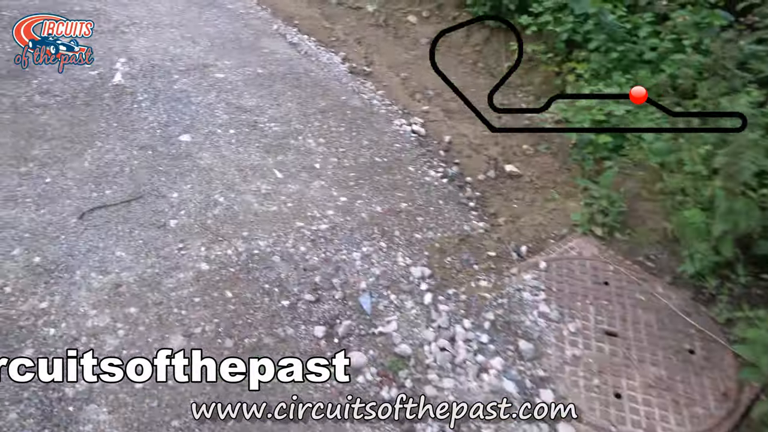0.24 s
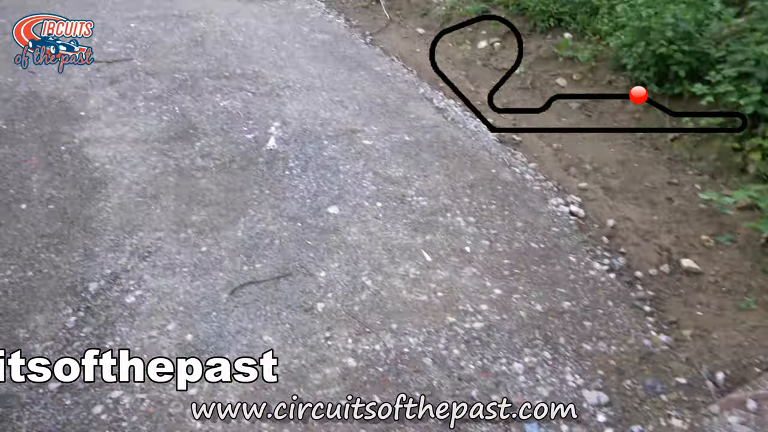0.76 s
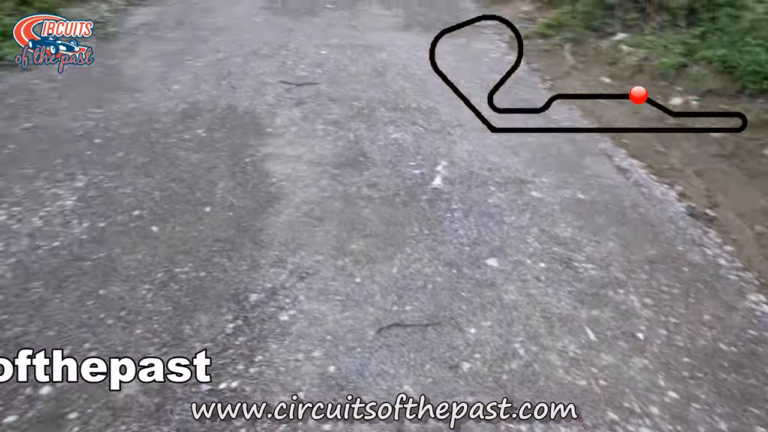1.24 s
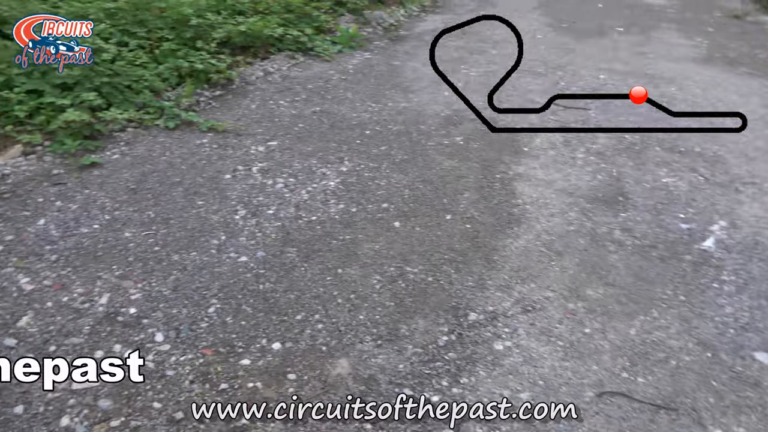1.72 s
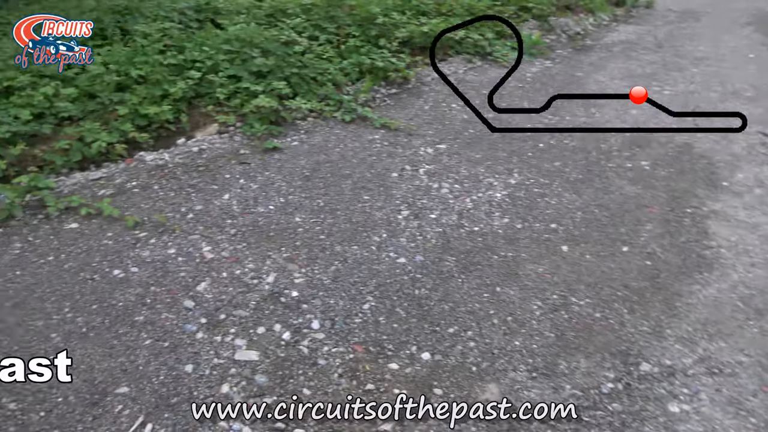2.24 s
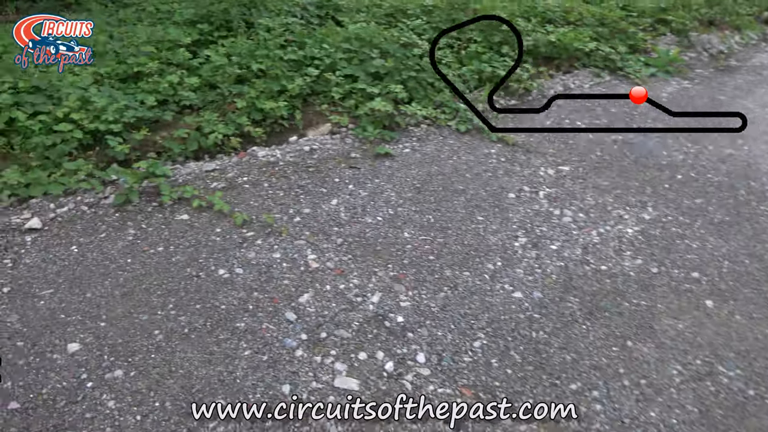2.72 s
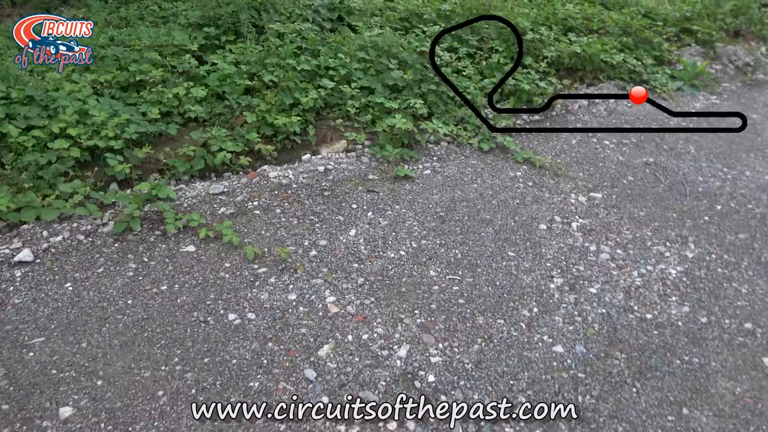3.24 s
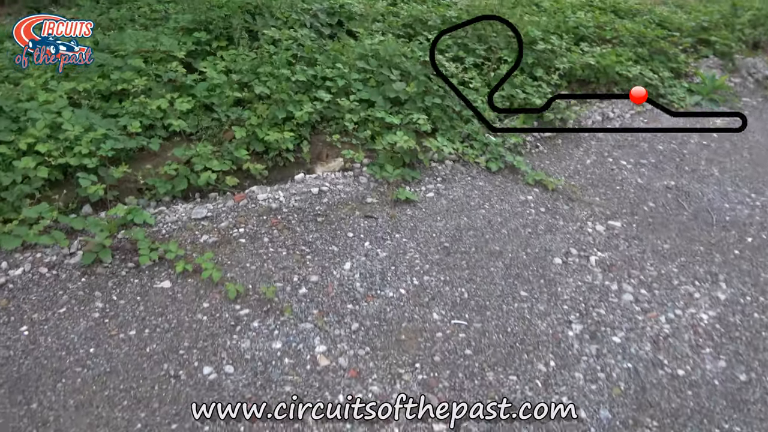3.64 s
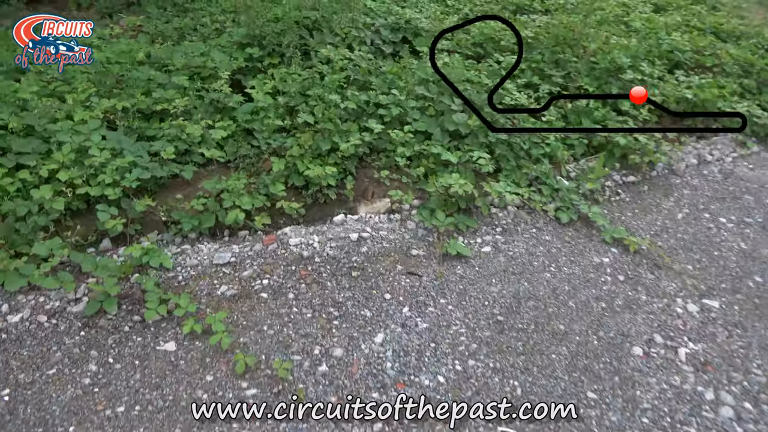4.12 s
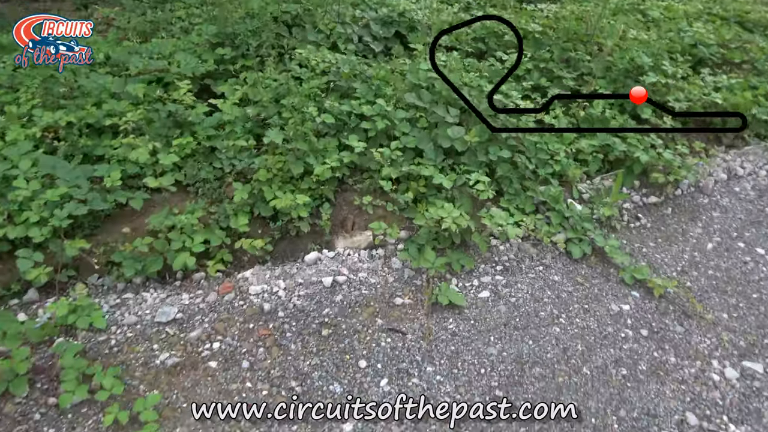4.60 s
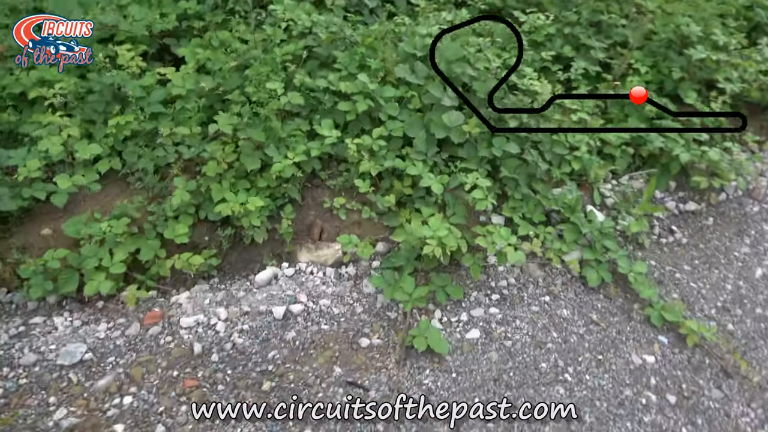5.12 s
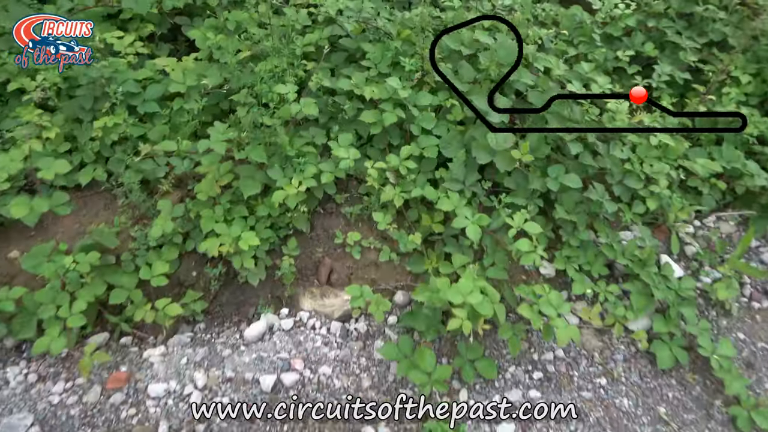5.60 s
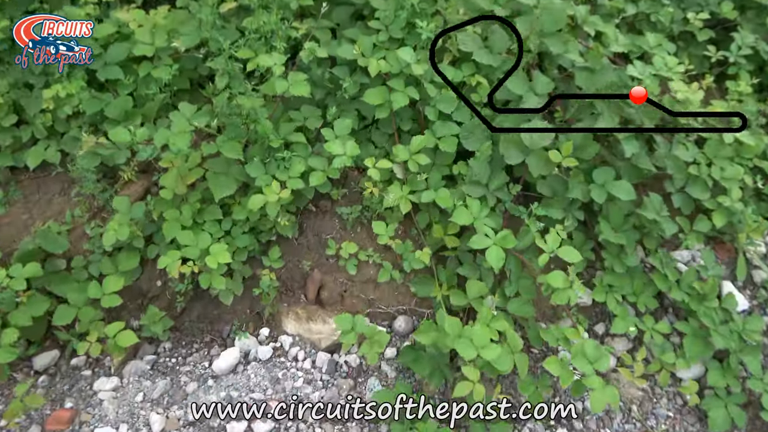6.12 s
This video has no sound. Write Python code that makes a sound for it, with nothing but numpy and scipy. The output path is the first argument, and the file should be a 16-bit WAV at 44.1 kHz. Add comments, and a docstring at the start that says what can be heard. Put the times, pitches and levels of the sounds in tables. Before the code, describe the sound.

Slow, uneven footsteps on loose gravel over broken asphalt, outdoors and close below a hand-held stereo microphone. Each step mixes small stones grinding, gritty hiss, single sharp stone cracks and often a soft, dull knock. A loud crack comes right at the start, and crunching continues until about 0.9 seconds. Lighter steps follow near 1.3 seconds, with a firmer one at 1.8. After 2 seconds there is a lull, broken by short crunches and clicks around 2.9 and 3.2. A strong step with a loud crack lands at 3.8 seconds. The gravel then shifts more busily from 4.2, with another sharp crack near 5.2 and further crunches around 5.7 and 6 seconds. The steps sound dry and sit slightly left of centre. Throughout, far traffic and air make a faint, slowly swelling rumble, with a low wavering hum and light steady hiss.

```python
"""Slow footsteps on loose gravel

Gravel over broken asphalt, close below the stereo microphones of a hand-held camera.
Single stones crack under the sole while many small ones grind, and the foot lands with a dull knock.
Far traffic and air rumble behind, a low hum wavers, the microphones hiss."""
import sys
import numpy as np
from scipy import signal
from scipy.fft import rfft, irfft, next_fast_len
from scipy.io import wavfile
from scipy.ndimage import map_coordinates

SR = 44100
rng = np.random.default_rng(int(sys.argv[2]) if len(sys.argv) > 2 else 0)


def persist_wave(psi):
    """Save psi, clipped to +-1, as 16-bit WAV."""
    counts = np.round(np.clip(psi, -1, 1) * 32767).astype(np.int16)
    wavfile.write(sys.argv[1], SR, np.atleast_2d(counts).T)


N = 280035

# Single stones underfoot: t/s, peak level/dB, f/Hz, chip level over the peak/dB
STONE_CRACKS = [(0.0053, -30, 1160, -19), (0.0087, -7, 1320, -20), (0.0117, -3.5, 1160, -31),
                (0.1218, -27, 1470, -12), (0.1408, -22.5, 1230, -8.5), (0.2838, -24, 1380, -20),
                (0.3096, -25.5, 1630, -20), (0.337, -37, 2840, -5), (0.4003, -31.5, 930, -30),
                (0.489, -25.5, 1540, -17), (0.5498, -23, 1280, -5), (0.5761, -24, 774, -3),
                (0.5941, -25, 2500, -5.5), (0.6026, -24.5, 1650, -13), (0.6238, -22, 1710, -24),
                (0.651, -29, 1200, 0.5), (0.669, -24, 1560, -27), (0.7, -28, 765, -12.5),
                (0.7603, -25.5, 2150, -19), (0.7741, -23.5, 3020, -23), (0.8356, -37, 1370, 0.5),
                (0.8475, -24, 1550, -17), (1.307, -24, 1530, -31), (1.434, -34.5, 1480, -14),
                (1.5077, -37, 1530, -4), (1.557, -37, 1700, -25), (1.6007, -38.5, 1550, -2.5),
                (1.6145, -31, 2070, -15), (1.6924, -34, 1620, -14), (1.7228, -31, 2040, -16),
                (1.757, -30, 690, -21), (1.8235, -23, 1730, -8.5), (1.8336, -13.5, 626, -15),
                (1.8379, -20, 700, -19), (1.8591, -30.5, 1150, -2.5), (1.8941, -34.5, 2000, -6),
                (1.9394, -26, 1120, -16), (1.9588, -33, 2370, -16), (2.024, -27.5, 1920, -36),
                (2.2211, -34, 1160, -12.5), (2.6083, -39.5, 2560, -10), (2.833, -26.5, 1700, -11.5),
                (2.8613, -17, 1880, -10.5), (2.9393, -32.5, 3700, -11), (3.105, -26, 660, -14.5),
                (3.1269, -30.5, 1540, -13), (3.2082, -15.5, 1630, -12.5), (3.465, -37, 2000, -12),
                (3.5912, -31, 840, -8.5), (3.7903, -21.5, 780, -10), (3.7945, -21, 1130, -16),
                (3.8058, -21.5, 1930, -3.5), (3.8128, -27.5, 1220, -5), (3.842, -5, 1290, -27.5),
                (3.8472, -15, 1750, -33), (3.867, -22, 1870, -16), (3.9078, -28, 1160, -8),
                (3.916, -33, 790, -2), (3.9313, -32, 1910, -5), (3.9471, -29, 2260, -12),
                (3.994, -33, 635, -7), (4.2242, -31.5, 1710, -12), (4.2914, -38.5, 3500, 1),
                (4.3411, -26, 2630, -26), (4.3594, -30, 1940, -15), (4.4267, -31, 1660, -17),
                (4.4789, -26.5, 1780, -11), (4.4865, -29, 1710, -9), (4.5331, -19, 1610, -14),
                (4.5876, -22.5, 1280, -8), (4.705, -21, 790, -18), (4.721, -29.5, 630, -25),
                (4.7496, -26.5, 1510, -17), (4.789, -36, 784, -46), (4.8403, -22.5, 1680, -51),
                (4.8642, -27, 736, -14), (4.883, -26, 1890, -15), (4.8942, -25, 826, -15),
                (4.917, -20.5, 1220, -21), (4.956, -26, 1750, -12), (5.0088, -26, 1720, -19),
                (5.0161, -27.5, 694, -10.5), (5.0926, -21, 1330, -15), (5.1468, -19, 1480, -17),
                (5.1588, -8.5, 1600, -37), (5.1617, -15, 1810, -30), (5.1872, -14.5, 2700, -18),
                (5.3595, -32, 2460, -5), (5.449, -36, 2200, -20), (5.4997, -27.5, 2000, -13),
                (5.5698, -15.5, 1670, -27), (5.5826, -28, 1600, -17), (5.6678, -32.5, 3210, -9),
                (5.7091, -22, 1060, -7), (5.7998, -22.5, 1170, -26), (5.8346, -22.5, 1400, -10),
                (5.9561, -22, 1000, -23), (5.9733, -27, 1290, -18), (5.98, -32, 3080, -9),
                (6.043, -18.5, 1230, -21), (6.0638, -25, 1190, -24), (6.0874, -33, 1200, -9)]
# Harder blows mostly ring less: peak level/dB, ring length factor
RING_BY_LEVEL = [(-55, 0.73), (-34, 1.15), (-21, 0.91), (-4.5, 0.7)]
# The sole presses into gravel: t/s, hold/s, pebble level/dB, grit level/dB
CRUNCHES = [(0.0, .005, -37.5, -46), (0.029, 0.068, -43.5, -47.5), (0.114, 0.013, -37, -49),
            (.27, 0.25, -50.5, -55), (0.499, .005, -40, -55), (0.538, 0.018, -39.5, -48),
            (0.57, .02, -37, -42.5), (.6, 0.062, -41.5, -52.5), (0.684, 0.045, -46, -52),
            (0.757, 0.017, -44, -47), (0.832, 0.014, -42.5, -50.5), (0.96, 0.36, -69, -59.5),
            (1.279, 0.033, -40.5, -54), (1.4, 0.24, -57.5, -62.5), (1.715, 0.06, -44.5, -57),
            (1.828, 0.016, -37, -49), (1.94, 0.074, -53.5, -64), (2.857, 0.002, -38, -44),
            (2.914, 0.12, -54.5, -58.5), (3.066, 0.076, -49, -57.5), (3.453, 0.066, -59, -67),
            (3.597, 0.04, -51, -68), (3.79, 0.016, -31.5, -41.5), (3.837, .01, -34, -41),
            (3.936, 0.046, -48.5, -64.5), (4.226, 0.22, -55.5, -59.5), (4.479, 0.011, -38.5, -50.5),
            (4.52, 0.027, -39, -46.5), (4.565, 0.023, -40.5, -45.5), (4.724, 0.52, -49.5, -61),
            (5.058, 0.029, -45.5, -55), (5.088, 0.057, -37.5, -50), (5.155, 0.019, -40, -44),
            (5.185, 0.052, -45.5, -57), (5.582, 0.013, -46, -51), (5.698, 0.021, -38.5, -43),
            (5.724, 0.099, -37.5, -49), (5.838, 0.0064, -34.5, -45.5), (5.968, .01, -43, -70),
            (6.03, 0.31, -53, -67)]
# Spectrum of fine grit: f/Hz, level/dB
GRIT_SPECTRUM = [(1500, -4.5), (3000, 4), (4000, -4.5), (7400, -6), (12000, -17), (16000, -37)]
# The sole meets the ground: t/s, peak level/dB, f/Hz
FOOTFALLS = [(0.531, -38, 413), (.85, -37, 285), (1.174, -36.5, 380), (1.288, -39, 426), (1.835, -32, 477),
             (3.107, -46, 317), (3.793, -33, 364), (3.804, -31, 340), (4.488, -41, 276), (4.541, -36, 485),
             (5.711, -26, 420)]
# Colour from ground bounce and camera housing: f/Hz, gain/dB
PATH_TO_MICS = [(60, -4), (250, -1), (700, -2.5), (1850, 0), (2500, -3.5), (3700, 0.5), (6000, -2),
                (16000, -2.5)]
# Where the feet sit between the microphones: t/s, left minus right/dB
FEET_PAN = [(0.0, 1), (0.9, 2), (1.47, -4), (1.68, 2.5), (2.0, 4), (2.33, 0), (4.3, 5.0), (5.5, 2),
            (6.35, 8)]
# Far traffic and air: t/s, level/dB
RUMBLE_LEVEL = [(0.0, -47), (0.56, -51.5), (0.99, -45.5), (1.4, -53), (2.14, -53), (2.92, -49.5),
                (3.36, -53), (3.96, -45), (5.34, -52), (6.07, -47), (6.35, -48)]
# Spectrum of rumble and hiss: f/Hz, level/dB
BACKGROUND_SPECTRUM = [(15, -56), (35, -3.5), (70, -7), (150, -2), (250, -9), (320, -14.5), (480, -18),
                       (830, -15), (1000, -26), (1300, -20.5), (1700, -32.5), (2500, -34), (6000, -32.5),
                       (16000, -45)]
# How alike the background is at the two microphones: f/Hz, correlation
BACKGROUND_LIKENESS = [(40, .995), (130, .95), (300, .85), (3000, .8), (6500, .2), (15000, .2)]
# Which way the background leans: f/Hz, left minus right/dB
BACKGROUND_PAN = [(60, -.3), (400, 4), (1300, 1), (4400, -1), (15000, 0)]


def amp(db):
    """Gain of a level in dB."""
    return 10 ** (np.asarray(db) / 20)


def unit(x):
    """x at rms 1."""
    return x / np.sqrt(np.mean(x ** 2) + 1e-20)


def along(points, hz):
    """A table of f/Hz and value, read on a log frequency axis."""
    f, value = np.transpose(points)
    return np.interp(np.log(hz + 1), np.log(f + 1), value)


def curve(points):
    """A table of t/s and value, read at every sample."""
    return np.interp(np.arange(N) / SR, *np.transpose(points))


def wobble(rate):
    """A smooth random curve, rate knots a second."""
    knots = rng.standard_normal(int(N * rate / SR) + 4)
    return map_coordinates(knots, [np.arange(N) * rate / SR])


def filtered(x, response):
    """x through a gain given as a function of f/Hz."""
    size = next_fast_len(N + 8192)
    return irfft(rfft(x, size) * response(np.fft.rfftfreq(size, 1 / SR)), size)[..., :N]


def knocks(times, gain, hz, cycles, rise=0.4, size=256):
    """Small impacts: each dips, peaks at its time, then rings down about 10 dB in the given cycles."""
    offset = np.arange(size) - size // 4
    turns = offset / SR * hz[:, None]
    ring = np.clip(cycles, .3, 6).reshape(-1, 1)
    fall_db = -10 * (np.hypot(turns, .3) - .3) / ring  # rounded at the top
    envelope = np.where(turns < 0, np.exp(-(turns / rise) ** 2), amp(fall_db))
    waves = gain[:, None] * envelope * np.cos(2 * np.pi * turns) * signal.windows.tukey(size)
    at = np.clip(np.round(times * SR).astype(int)[:, None] + offset, 0, N)
    return np.bincount(at.ravel(), waves.ravel(), N + 1)[:N]


def background():
    """Far traffic and air, swelling slowly and near mono in the bass, over steady microphone hiss."""
    def mid_side_gains(hz):
        angle = np.arccos(np.clip(along(BACKGROUND_LIKENESS, hz), -1, 1)) / 2
        return amp(along(BACKGROUND_SPECTRUM, hz)) * [np.cos(angle), np.sin(angle)]

    mid, side = filtered(rng.standard_normal((2, N)), mid_side_gains)
    pair = np.array([mid + side, mid - side])
    pair = unit(filtered(pair, lambda hz: amp(along(BACKGROUND_PAN, hz) * [[.5], [-.5]])))
    rumble = filtered(pair, lambda hz: 1 / (1 + (hz / 600) ** 2))
    hiss = pair - rumble
    return amp(curve(RUMBLE_LEVEL) + 0.48 * wobble(5.28)) * rumble + amp(-49) * hiss


def far_hum(hz, db):
    """A low hum that wavers, perhaps a far engine."""
    phase = 2 * np.pi * np.cumsum(hz * (1 + 0.0446 * wobble(3.7))) / SR
    return amp(db + 2.1 * wobble(8)) * np.sin(phase)


def sole_pressure(peak_db, settle_db, settle_db_per_s):
    """Gain of the gravel: each crunch swells, holds, stops, and leaves stones settling."""
    press_db_per_s, release_db_per_s, trickle_db = 1400, 454, -64
    start, hold = np.transpose(CRUNCHES)[:2]
    t = np.arange(0, N, 44) / SR
    before = np.maximum(start[:, None] - t, 0)
    after = np.maximum(t - (start + hold)[:, None], 0)
    fall_db = np.maximum(-release_db_per_s * after, settle_db - settle_db_per_s * after)
    shape_db = fall_db - press_db_per_s * before
    power = amp(peak_db) ** 2 @ amp(shape_db) ** 2 + amp(trickle_db) ** 2
    return np.interp(np.arange(N) / SR, t, np.sqrt(power))


def stone_swarm(count, hz, spread, cycles, size_db):
    """Many stones clicking at random, rms 1: pitches scatter around hz, a few are much louder."""
    when, direction, size = rng.random((3, count))
    pitch = np.clip(hz * np.exp(spread * rng.standard_normal(count)), 200, 14000)
    gain = np.sign(direction - .5) * amp(np.clip(-size_db * np.log(size), 0, 18))
    return unit(knocks(when * N / SR, gain, pitch, cycles))


def sand():
    """Fine grit hiss of rms 1."""
    return unit(filtered(rng.standard_normal(N), lambda hz: amp(along(GRIT_SPECTRUM, hz))))


def grinding():
    """Pebbles shift in clumps under the sole, sand hisses between them."""
    pebble_db, grit_db = np.transpose(CRUNCHES)[2:]
    pebble_gain = sole_pressure(pebble_db, settle_db=-11, settle_db_per_s=63)
    grit_gain = sole_pressure(grit_db, settle_db=-12, settle_db_per_s=57)
    clumps = wobble(60)
    crowd = stone_swarm(count=6000, hz=1089, spread=0.6, cycles=2.03, size_db=4.5)
    strays = stone_swarm(count=900, hz=1690, spread=0.26, cycles=1.6, size_db=3.5)
    fines = stone_swarm(count=12000, hz=4140, spread=0.57, cycles=2.0, size_db=10.5)
    pebbles = unit(crowd + 0.58 * strays)
    grit = unit(0.69 * fines + 0.61 * sand())
    return pebble_gain * amp(0.47 * clumps) * pebbles + grit_gain * amp(0.85 * clumps) * grit


def stone_cracks():
    """Each stone knocks at its own pitch; its chipped edge adds an overtone and a spit of sand."""
    times, db, hz, chip_db = np.transpose(STONE_CRACKS)
    ring = np.interp(db, *np.transpose(RING_BY_LEVEL)) * np.exp(0.01 * (chip_db - chip_db.mean()))
    direction, detune = rng.standard_normal((len(times), 2)).T
    sign = np.where(db > -21, 1, np.sign(direction))  # hard blows push, small slips go either way
    knock = knocks(times, sign * amp(db), hz, cycles=.75 * ring, rise=.52 * ring[:, None])
    overtone_hz = 2.29 * hz * np.exp(0.08 * detune)
    overtone = knocks(times, amp(db + 0.82 * chip_db - 3), overtone_hz, cycles=1.8, rise=0.74)
    chips = np.bincount(np.round(times * SR).astype(int), amp(db + chip_db), N)
    t = np.arange(SR // 50) / SR
    spit_shape = amp(-60 * t / 0.0096) * (1 - np.exp(-t / 0.00019))
    spit = np.convolve(chips, spit_shape)[30:N + 30]  # starts just before the knock peaks
    return knock + overtone + spit * sand()


def ground_scatter(feet, rt60_s):
    """A short scatter off nearby ground and bushes, different at each microphone."""
    t = np.arange(SR // 8) / SR
    tail = rng.standard_normal((2, len(t))) * amp(-60 * t / rt60_s)
    return signal.fftconvolve(feet[None], tail / np.linalg.norm(tail[0]), axes=1)[:, :N]


def foot_thuds():
    """The weight of the foot: a dull, low knock."""
    times, db, hz = np.transpose(FOOTFALLS)
    return knocks(times, amp(db), hz, cycles=1.8, rise=0.74, size=1024)


def scene():
    """The feet close below the microphones, their scatter around, the traffic far behind."""
    feet = stone_cracks() + foot_thuds() + grinding()
    feet = filtered(feet, lambda hz: amp(along(PATH_TO_MICS, hz)))
    pan_db = curve(FEET_PAN)
    direct = feet * amp([pan_db / 2, -pan_db / 2])
    scatter = amp(-12) * ground_scatter(feet, rt60_s=0.048)
    return direct + scatter + background() + far_hum(hz=70.1, db=-56)


def record(dry):
    """The camera keeps nothing above its band limit."""
    return filtered(dry, lambda hz: hz < 15830)


dry = scene()
out = record(dry)
persist_wave(out)
```